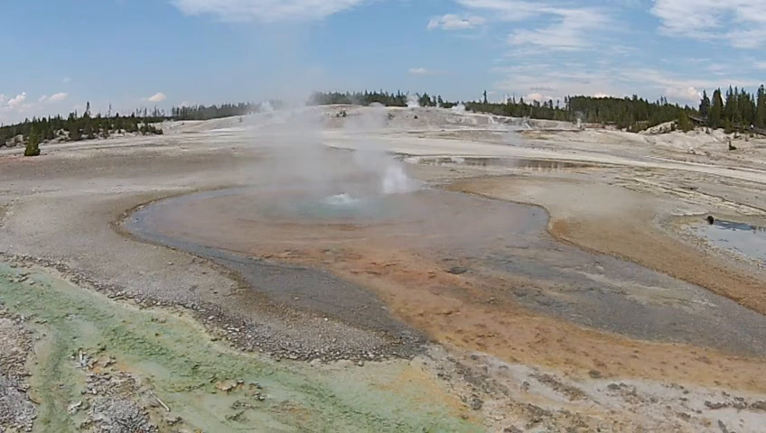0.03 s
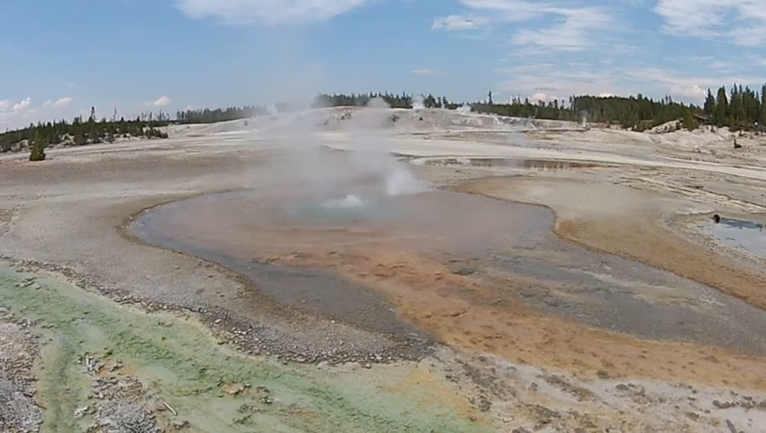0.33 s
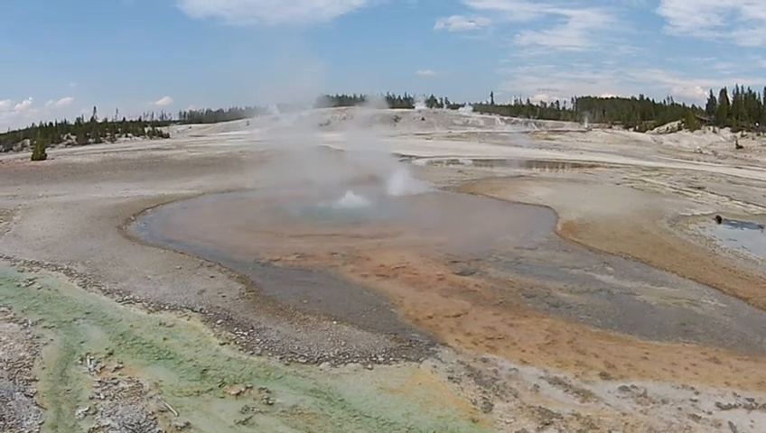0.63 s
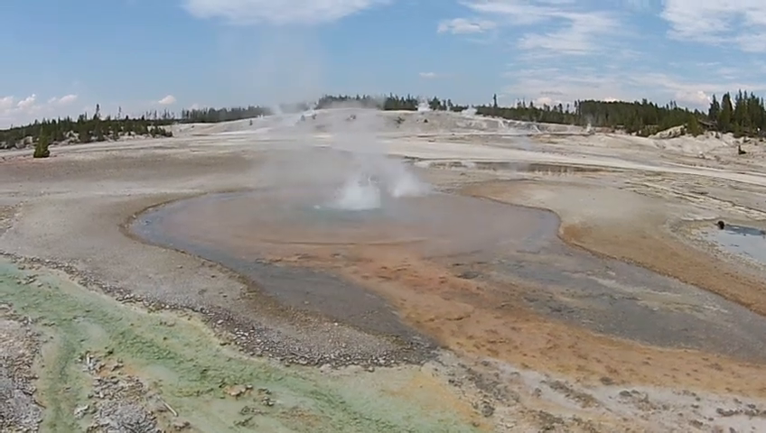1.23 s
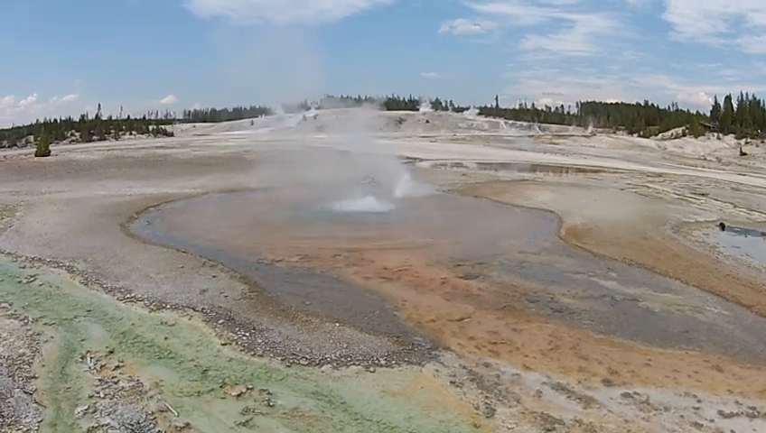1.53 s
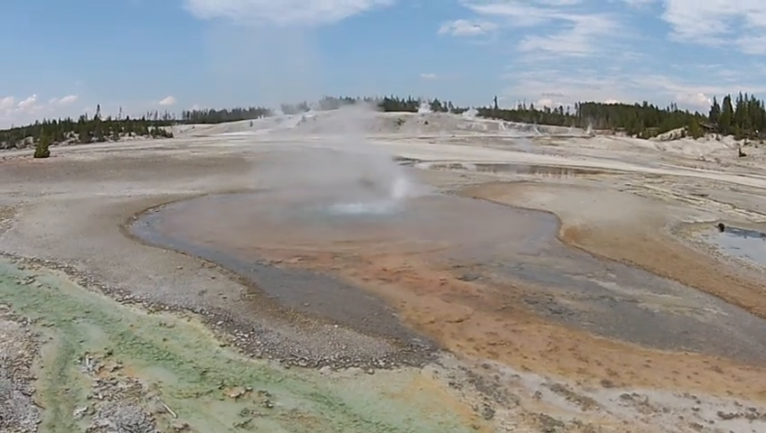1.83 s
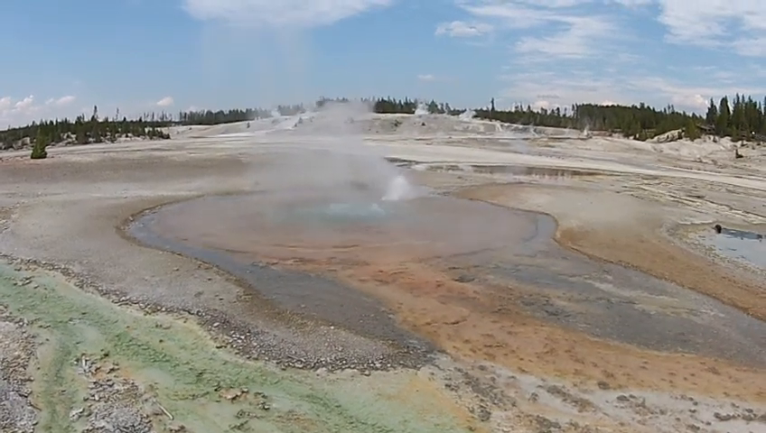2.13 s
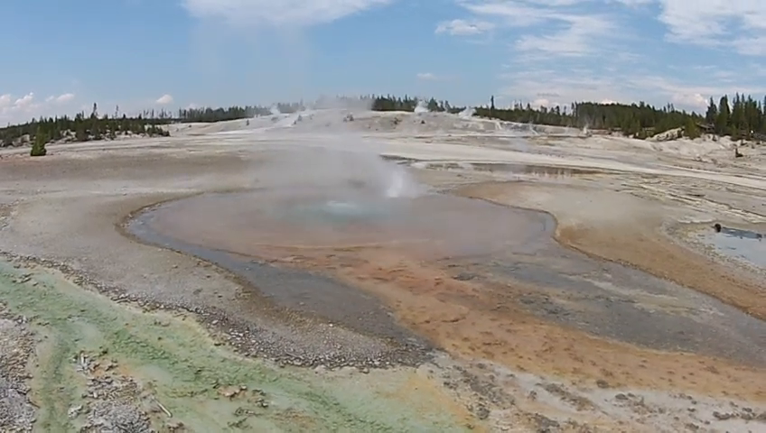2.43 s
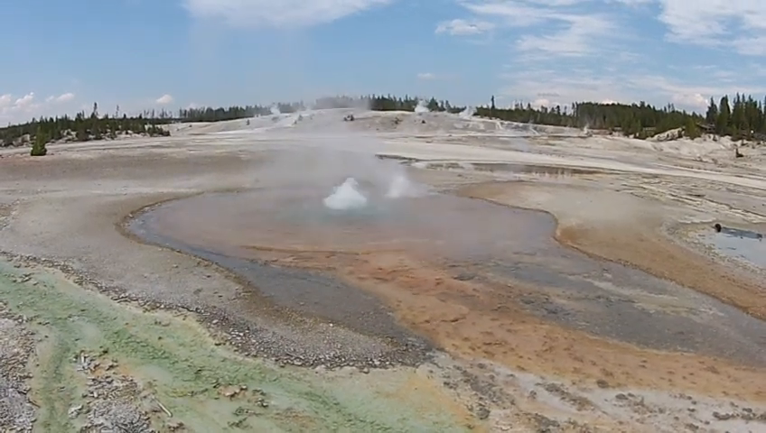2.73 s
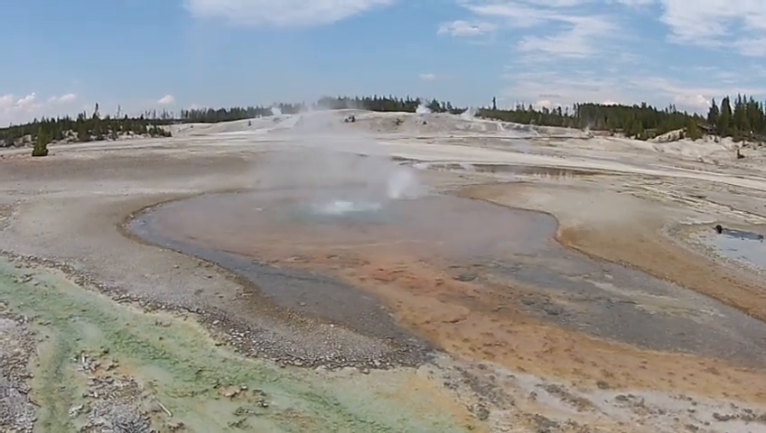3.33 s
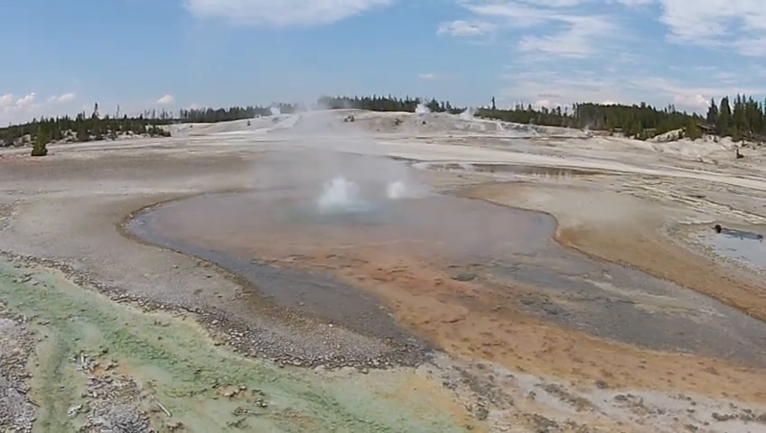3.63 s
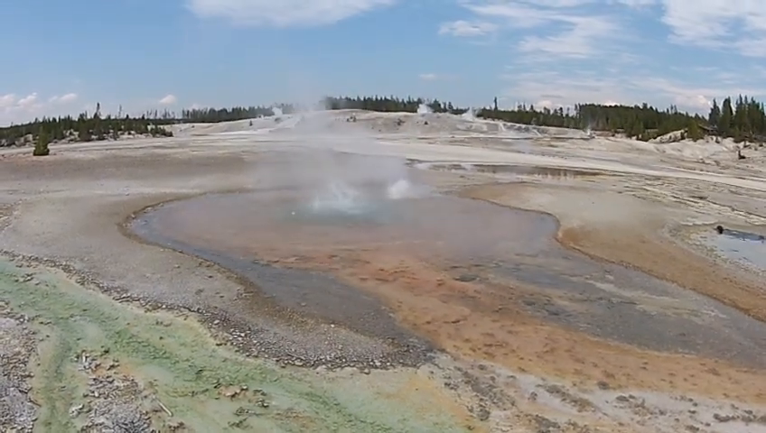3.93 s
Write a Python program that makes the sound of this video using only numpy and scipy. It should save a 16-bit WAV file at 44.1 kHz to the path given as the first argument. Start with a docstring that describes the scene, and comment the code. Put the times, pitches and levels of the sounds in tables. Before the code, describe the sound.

Hot spring water bubbles and churns in the open air, gulping about seven times a second. A brief click on the camera comes early, then light splashes swell twice among small drips, all heard in near mono.

```python
"""Thumping gulps, about seven a second: a hot spring boils as gas comes up the vent in swells of bubbles.
The pool churns between gulps, surges splash back as spray and single drops, and a little wind rumbles.
A tap on the camera rings its housing once. The sound is near mono, and the water is coarsely
sampled, so a faint sizzle mirrors it in the high treble."""
import sys
import numpy as np
from scipy import signal
from scipy.fft import rfft, irfft
from scipy.io import wavfile
from scipy.ndimage import uniform_filter1d, map_coordinates

SR = 44100
rng = np.random.default_rng(int(sys.argv[2]) if len(sys.argv) > 2 else 0)


def dump(signal):
    """Clip the signal to [-1, 1] and save it as 16-bit WAV at the path in sys.argv[1]."""
    limited = np.clip(np.atleast_2d(signal).T, -1, 1)
    pcm = np.round(limited * 32767).astype(np.int16)
    wavfile.write(sys.argv[1], SR, pcm)


N = 176400


def amp(db):
    """Decibels to gain."""
    return 10 ** (np.asarray(db) / 20)


def unit(x):
    """Scale to rms 1."""
    return x / np.sqrt(np.mean(x ** 2) + 1e-20)


def curve(rows):
    """Join (seconds, value) points into one value per sample."""
    return np.interp(np.arange(N) / SR, *np.transpose(rows))


def wobble(rate):
    """A smooth random curve, rate knots a second."""
    return map_coordinates(rng.standard_normal(int(N * rate / SR) + 4), [np.arange(N) * rate / SR])


def colour(x, points):
    """EQ x through (Hz, dB) points on a log axis; rms 1."""
    f, db = np.transpose(points)
    hz = np.fft.rfftfreq(N, 1 / SR)
    return unit(irfft(rfft(x) * amp(np.interp(np.log(hz + 1), np.log(f), db)), N))


def noise(points):
    """Coloured noise of rms 1."""
    return colour(rng.standard_normal(N), points)


def bubbles(per_s, lo_hz, hi_hz, cycles, spread_db, rise, samples):
    """A random rain of damped sines that rise in pitch as they die; rms 1."""
    when, pitch, strength, polarity = np.hsplit(rng.random((int(per_s * N / SR), 4)), 4)
    hz = lo_hz + (hi_hz - lo_hz) * pitch
    turns = hz * np.arange(samples) / SR
    age = turns / cycles
    envelope = np.exp(-np.log(100) * age) * (1 - np.exp(-2 * turns))
    ring = envelope * np.sin(2 * np.pi * turns * (1 + rise * np.minimum(age, 1)))
    gain = amp(-spread_db * np.log(np.maximum(strength, .005))) * np.sign(polarity - .5) * np.sqrt(hz)
    at = (when * N).astype(int) + np.arange(samples)
    return unit(np.bincount(at.ravel() % N, (gain * ring).ravel(), N))


def gulps():
    """Gas swells through small, then large bubbles and thumps at the surface; two gulps slop over."""
    # Each row: centre and half width in seconds, large and small bubble levels in dB,
    # thump delay in seconds, thump level in dB, thump pitch in Hz.
    gas_gulps = [(0.11, 0.012, -32, -44, 0.0023, -24, 185), (0.239, 0.021, -32.5, -35.5, 0.0008, -25, 170),
                 (0.389, 0.0081, -32.5, -44, 0.0014, -22.5, 220),
                 (0.524, 0.011, -32, -33.5, 0.0035, -30.5, 198),
                 (0.674, 0.012, -30, -35, -0.0035, -27.5, 245),
                 (0.822, 0.017, -29.5, -34.5, 0.0067, -29, 230),
                 (0.949, 0.023, -30, -36.5, 0.002, -24, 198),
                 (1.074, 0.022, -31.5, -35.5, -0.0093, -29, 162),
                 (1.203, 0.021, -30.5, -36, -0.0098, -29, 238), (1.36, 0.013, -37, -41, -0.002, -43, 240),
                 (1.505, 0.019, -36.5, -32, 0.02, -29, 200),
                 (1.653, 0.021, -31.5, -35.5, -0.0044, -27.5, 222),
                 (1.81, 0.019, -33, -39, -0.0056, -27.5, 188),
                 (1.959, 0.014, -32.5, -44.5, -0.0042, -23, 125),
                 (2.063, 0.016, -32, -39, -0.018, -29.5, 245),
                 (2.196, 0.024, -31.5, -36.5, -0.023, -25, 167),
                 (2.353, 0.011, -35, -38.5, 0.00055, -26.5, 274),
                 (2.505, 0.015, -35.5, -37.5, 0.019, -27, 128), (2.652, 0.014, -39, -50, -0.0035, -25, 129),
                 (2.819, 0.011, -36, -43, -0.003, -26.5, 170), (2.965, 0.018, -38, -41, -0.0091, -29.5, 90),
                 (3.09, 0.02, -32, -37.5, -0.0013, -30, 270), (3.19, 0.024, -35, -36, 0.028, -24.5, 168),
                 (3.324, 0.025, -35.5, -41.5, -0.018, -26.5, 242),
                 (3.482, 0.011, -34, -47, -0.0023, -25.5, 175),
                 (3.612, 0.016, -33, -33.5, -0.006, -31, 263),
                 (3.776, 0.0078, -30, -43.5, -0.00077, -24, 200),
                 (3.895, 0.022, -32.5, -33, 0.012, -26, 290)]
    # Each row: centre of a slop in seconds, level in dB.
    slops = [(1.192, -41), (3.606, -44.5)]
    # Tone of large bubbles, small bubbles and slops. Each row: frequency in Hz, gain in dB.
    large_eq = [(35, -19), (90, -5.5), (150, -4.5), (210, -1.5), (310, 0.5), (370, -7.5), (480, -34.5),
                (900, -71)]
    small_eq = [(200, -4.5), (400, -6), (540, 0.5), (700, 3.5), (820, -4), (960, -23.5), (1200, -24.5),
                (2200, -49)]
    slop_eq = [(600, -21), (900, -1.5), (1120, -7), (1350, -22), (2500, -41)]
    small_lead_s, thump_width_s, slop_width_s = 0.003, 0.0037, 0.019
    t, out = np.arange(N) / SR, np.zeros(N)
    bell = lambda s, width: np.exp(-.5 * ((t - s) / width) ** 2)
    large, small = noise(large_eq), noise(small_eq)
    for s, width, large_db, small_db, delay, thump_db, thump_hz in gas_gulps:
        thump = bell(s + delay, thump_width_s)
        large_swell = bell(s, width) * (1 - .5 * thump)  # ducks under the thump
        early = s - small_lead_s
        small_swell = bell(early, width) + 0.14 * bell(early, 2 * width)
        for source, swell, db in (large, large_swell, large_db), (small, small_swell, small_db):
            out += amp(db) * unit(source * swell) * np.sqrt(np.mean(swell ** 2))
        turns = thump_hz * (t - s - delay)
        out += amp(thump_db) * thump * np.sin(2 * np.pi * (turns + rng.random()))
    return out + noise(slop_eq) * sum(amp(db) * bell(s, slop_width_s) for s, db in slops)


def churn():
    """Bubbles keep the pool gurgling over the low boil of the vent."""
    # The gurgle's fader. Each row: time in seconds, level in dB.
    fader = [(.1, -49.5), (.6, -50), (1.12, -47), (1.72, -48.5), (2.34, -53.5), (2.61, -57), (2.67, -44.5),
             (3.17, -43.5), (3.45, -45), (4, -50)]
    # Tone of the gurgle and the boil. Each row: frequency in Hz, gain in dB.
    gurgle_eq = [(150, -25), (300, -3.5), (420, -7.5), (550, 0.5), (700, 2.5), (820, -2), (960, -22.5),
                 (1300, -17.5), (2000, -43)]
    boil_eq = [(20, -17), (50, -4), (100, 2.5), (160, 3.5), (290, -1.5), (400, -9.5), (700, -42)]
    gurgle = bubbles(1100, 249.4, 1579, cycles=8.9, spread_db=2.0, rise=0.029, samples=1600)
    boil = noise(boil_eq) * amp(-44.5 + 1.5 * wobble(15))
    return colour(gurgle, gurgle_eq) * amp(curve(fader)) + boil


def spray():
    """Thrown water lands as a hiss of droplets, with a few heavier splats."""
    # The shower's fader. Each row: time in seconds, level in dB.
    fader = [(.1, -59.5), (.45, -60), (.78, -56.5), (.92, -54), (1.11, -57.5), (1.35, -51), (1.53, -46.5),
             (1.66, -52.5), (1.85, -51.5), (2.05, -55), (2.29, -61.5), (2.61, -61.5), (2.66, -54),
             (2.78, -59.5), (3.0, -51), (3.2, -48), (3.43, -56.5), (3.8, -57), (3.95, -53.5)]
    # Each row: start of a splat in seconds, level in dB.
    splats = [(0.178, -55), (0.383, -55), (2.634, -47.5), (2.791, -53.5), (3.6165, -51.5)]
    # Tone of the shower and the splats. Each row: frequency in Hz, gain in dB.
    shower_eq = [(300, 1), (900, 6), (1250, 4.5), (1520, -7), (1880, 3.5), (2180, -4), (2480, 3.5),
                 (2720, -8), (2930, 1), (3150, -6.5), (3420, -1), (3750, -7.5), (4150, -3.5), (4550, -13),
                 (4900, -13), (5500, -19.5), (6000, -12)]
    splat_eq = [(600, -21), (2000, 7), (3400, 12), (4600, -2.5), (5800, -6)]
    flutter_db, splat_t60 = .8, 0.036
    t = np.arange(N) / SR
    drops = bubbles(700, 917, 5720, cycles=5.5, spread_db=2.5, rise=0.041, samples=400)
    shower = colour(rng.standard_normal(N) + amp(-9) * drops, shower_eq)
    shower *= amp(curve(fader) + flutter_db * wobble(55))
    splat_envelope = sum((t >= s) * amp(db - 60 * np.abs(t - s) / splat_t60) for s, db in splats)
    return shower + splat_envelope * noise(splat_eq)


def plinks():
    """A single drop swells into a very short ring whose pitch wavers as the water closes over it."""
    # Each row: start of a drop in seconds, peak level in dB, pitch in Hz.
    drops = [(0.2548, -42.5, 2350), (0.553, -53, 2530), (0.983, -50, 2930), (1.631, -47, 1920),
             (1.865, -47.5, 2500), (1.93, -49.5, 2420), (2.6603, -47, 1980), (3.286, -52, 2520)]
    peak_s, linewidth_hz = 0.0022, 90
    out, t = np.zeros(N + SR), np.arange(SR // 50) / SR
    envelope = t / peak_s * np.exp(.5 - .5 * (t / peak_s) ** 2)
    for s, db, hz in drops:
        waver = np.cumsum(rng.standard_normal(len(t))) * np.sqrt(2 * np.pi * linewidth_hz / SR)
        out[round(s * SR):][:len(t)] += amp(db) * envelope * np.sin(2 * np.pi * hz * t + waver)
    return out[:N]


def click():
    """Something hard taps the camera and rebounds lightly; both hits ring the quickly damped housing."""
    # Each row: start of a tap in seconds, gain in dB.
    taps = [(0.2252, -12.5)]
    # The housing's modes. Each row: frequency in Hz, relative level in dB, 60 dB decay time in seconds.
    modes = [(690, -5, 0.041), (1200, 4.5, 0.018), (1774, -7.5, 0.012), (2270, -4, 0.019),
             (3002, 4.5, 0.023), (3182, 1.7, 0.0094), (4010, -6.5, 0.014), (5040, -1.5, 0.0039),
             (7000, -2, 0.0033), (9034, -5, 0.021), (10839, -12.5, 0.019), (13193, -15.5, 0.0133),
             (14982, -11, 0.016)]
    rebound_s, rebound_db, damping_s = .00116, -7, .009
    crack_t60, crack_rise_s = 0.0095, 0.0011
    out, t = np.zeros(N + SR), np.arange(SR // 10) / SR
    ring = sum(amp(db - 60 * t / t60) * np.sin(2 * np.pi * hz * t) * (-1) ** k
               for k, (hz, db, t60) in enumerate(modes))
    ring *= np.exp(-.5 * (t / damping_s) ** 2)
    crack_envelope = amp(-3 - 60 * t / crack_t60) * (1 - np.exp(-t / crack_rise_s))
    for s, db in taps:
        for at, blow_db in (s, db), (s + rebound_s, db + rebound_db):
            crack = crack_envelope * uniform_filter1d(rng.standard_normal(len(t)), size=2)
            out[round(at * SR):][:len(t)] += amp(blow_db) * (ring + crack)
    return out[:N]


def wind():
    """A light, lumpy rumble on the microphone."""
    return noise([(25, -1.5), (50, -12), (200, -28)]) * amp(-77 + 3 * wobble(13))


def coarse(x):
    """Sample and hold: the band under half the rate is mirrored faintly on both sides of the rate."""
    hold_hz, edge_hz = 12000, 5510
    hz = np.fft.rfftfreq(N, 1 / SR)
    band = rfft(x) * (hz < hold_hz / 2) / np.sqrt(1 + (hz / edge_hz) ** 43)
    carrier = np.exp(2j * np.pi * hold_hz * np.arange(N) / SR)
    below = signal.hilbert(irfft(band * hz / np.maximum(hold_hz - hz, 1), N))
    above = signal.hilbert(irfft(band * hz / (hold_hz + hz), N))
    return irfft(band, N) + amp(0.5) * np.real((np.conj(below) - above) * carrier)


def scene():
    """The spring and the click sit dead centre; only the wind has a little width."""
    mono = coarse(gulps() + churn() + spray() + plinks() + wind()) + click()
    side = 0.25 * wind()
    return np.array([mono + side, mono - side])


def record(dry):
    """The sound snaps in after a moment of silence; a steep low-pass trims the very top."""
    start_s, fade_s, top_hz = .104, 0.0026, 15500
    opened = dry * np.clip((np.arange(N) / SR - start_s) / fade_s, 0, 1)
    return signal.sosfiltfilt(signal.butter(20, top_hz, fs=SR, output="sos"), opened)


dry = scene()
out = record(dry)
dump(out)
```